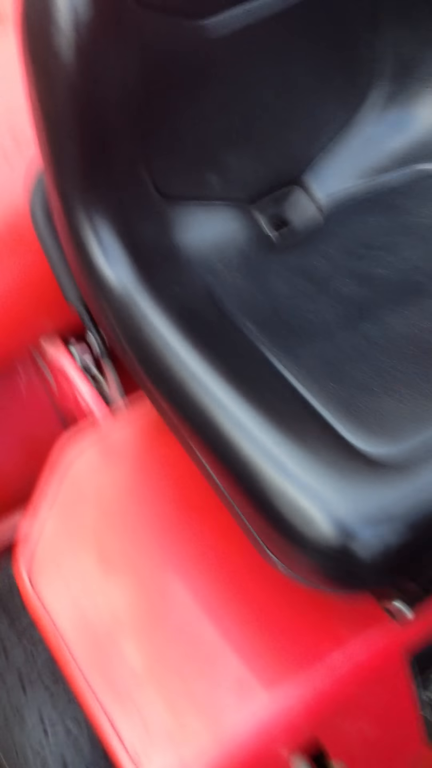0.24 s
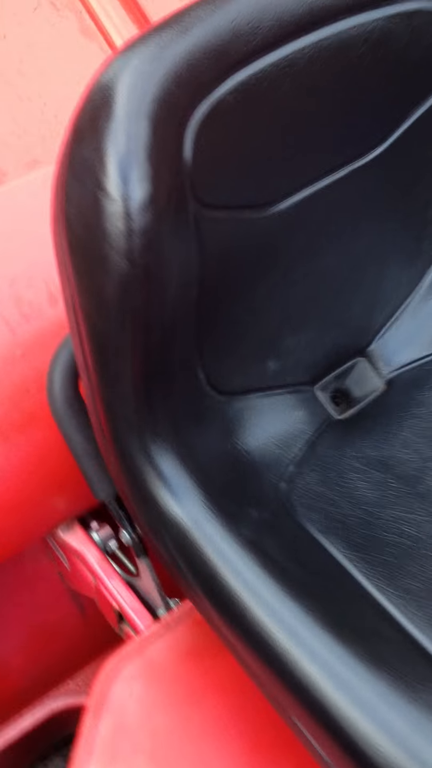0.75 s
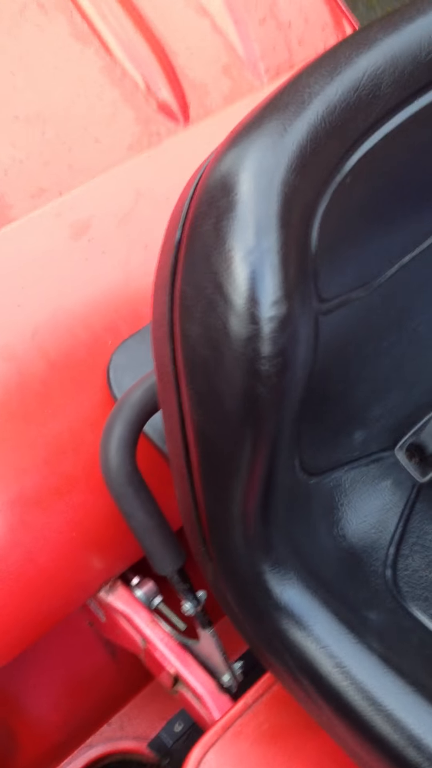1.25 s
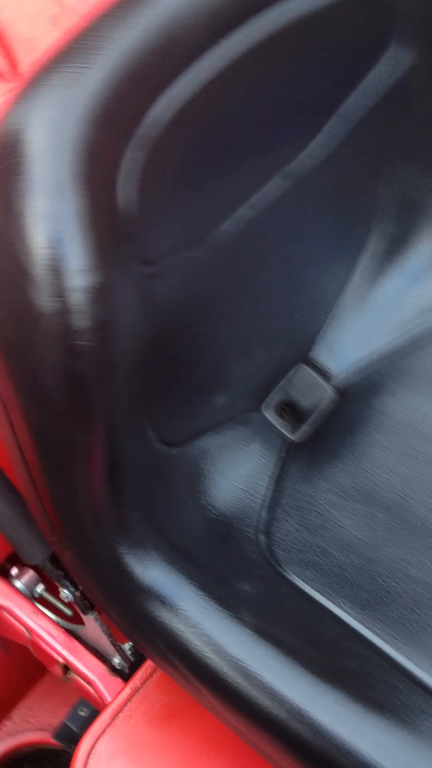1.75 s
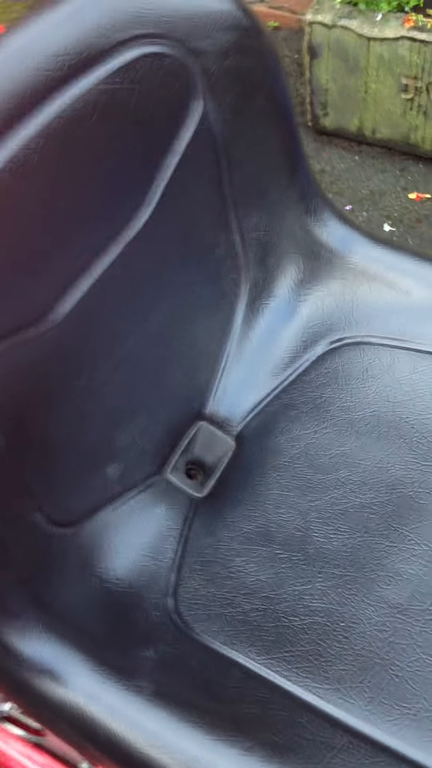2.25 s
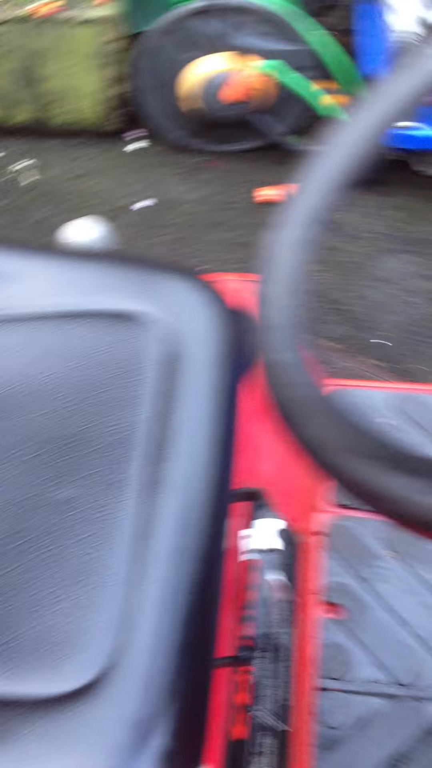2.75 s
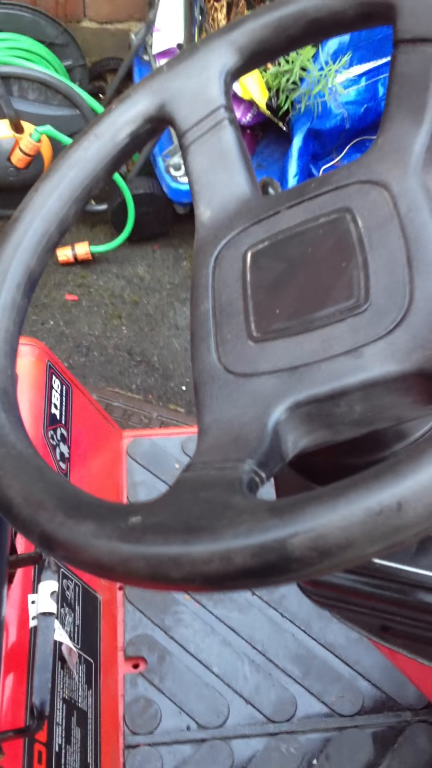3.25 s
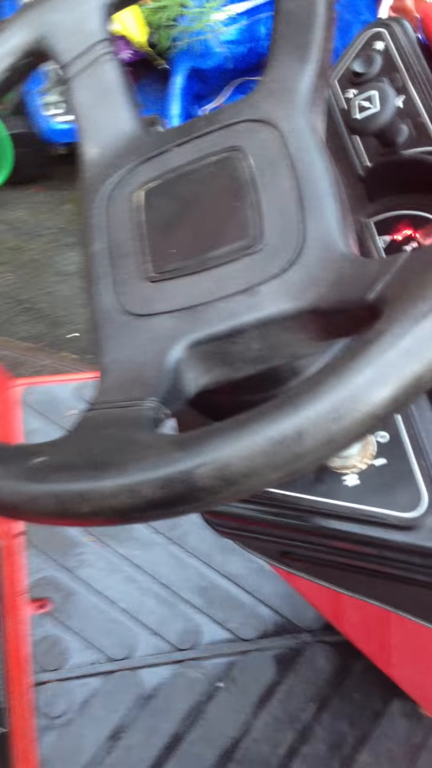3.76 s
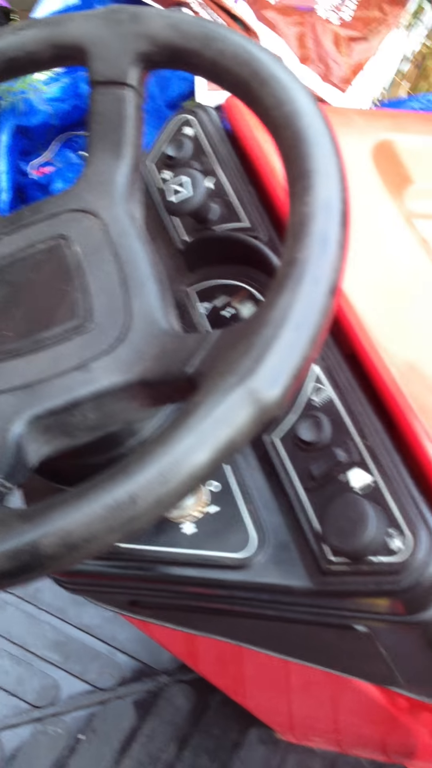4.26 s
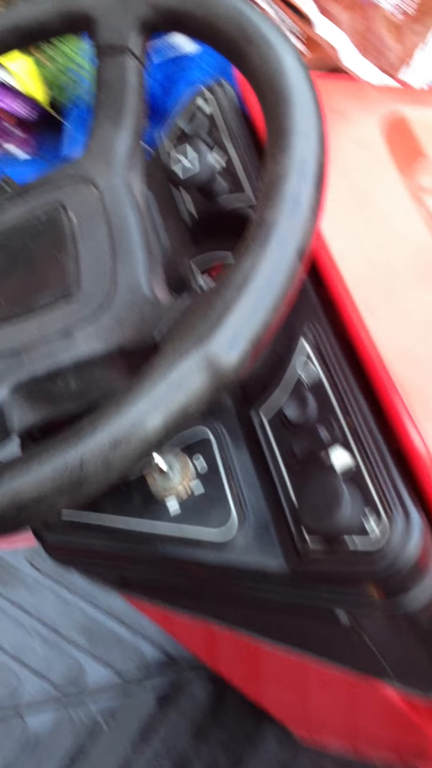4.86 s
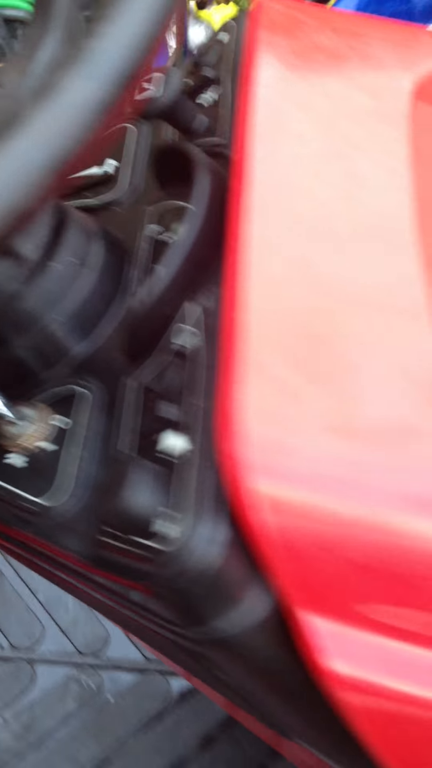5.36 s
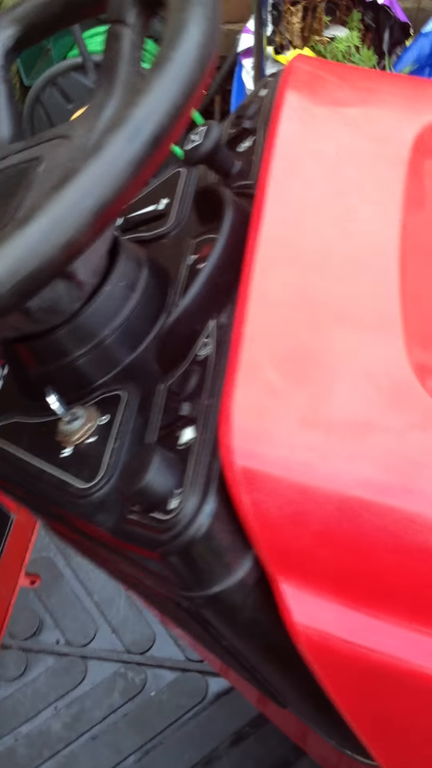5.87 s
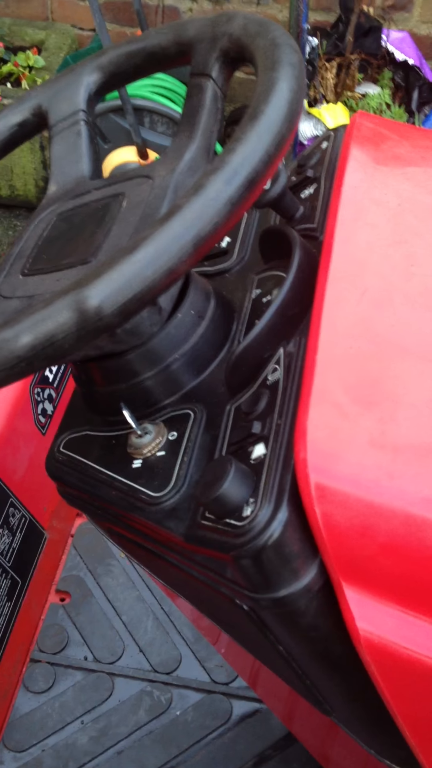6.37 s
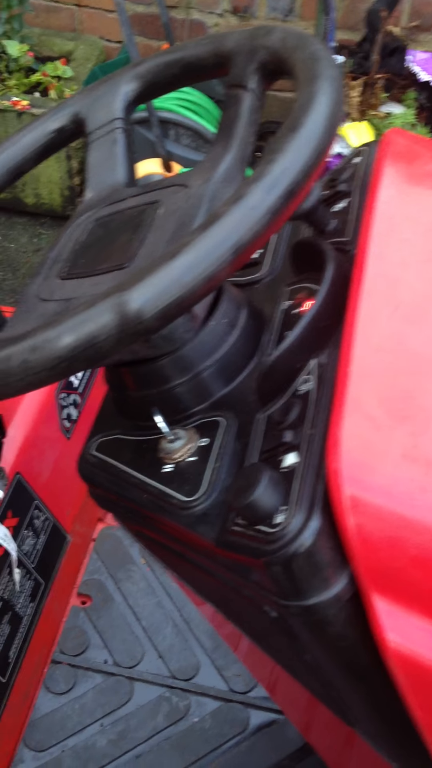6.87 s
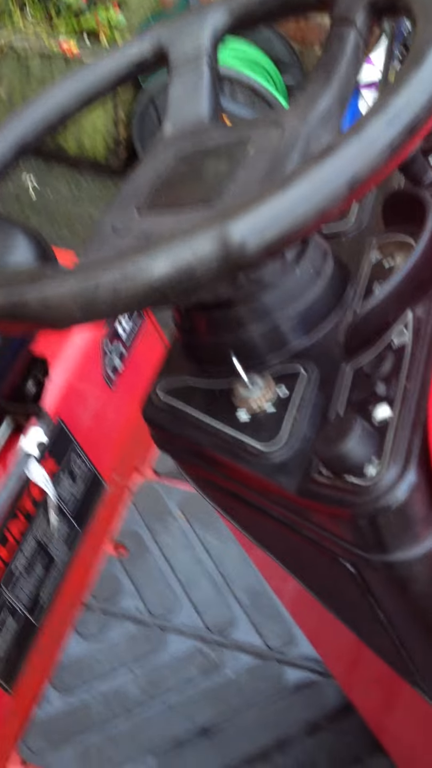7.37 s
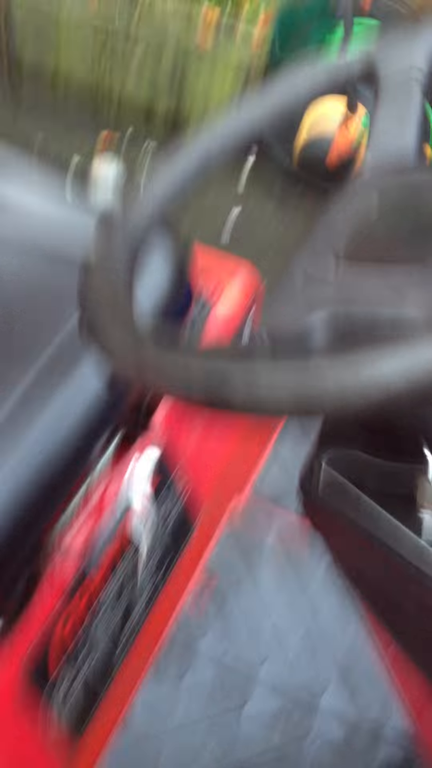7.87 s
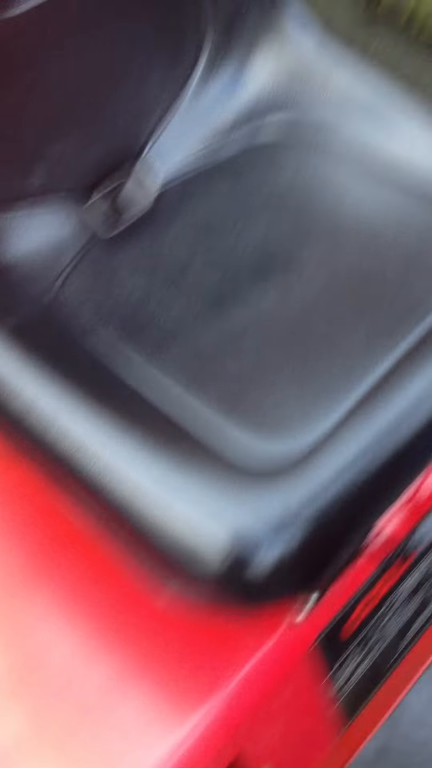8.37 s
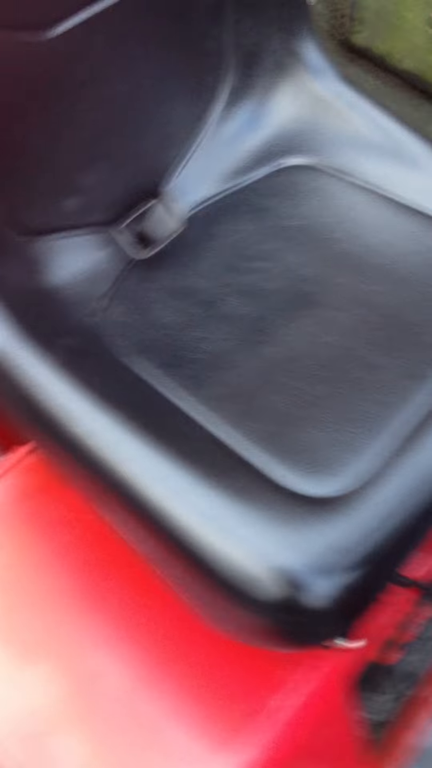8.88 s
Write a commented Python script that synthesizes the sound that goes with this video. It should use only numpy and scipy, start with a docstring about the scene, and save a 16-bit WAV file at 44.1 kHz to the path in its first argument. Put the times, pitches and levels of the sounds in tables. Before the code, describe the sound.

A single-cylinder ride-on mower idles close by outdoors, a quick low chug with hissing exhaust puffs and metallic casing rattle. A handheld microphone moves along it; a finger creeps over the port, dulling the treble. A loud scrape falls midway, then the engine is heavily muffled with little clicks, until a sharp pop opens the sound and it idles on, briefly ducked.

```python
"""Idling ride-on mower, finger on the microphone

A single-cylinder ride-on mower idles in a yard while a hand-held camera sweeps along it.
Each four-stroke cycle gives hissing exhaust puffs, a thump in the silencer and a casing rattle.
The hiss is shaped noise; thump, panels and outlet are ringing modes driven by pulses or noise.
A finger slides over the microphone port, muffles the engine, and lets go with a pop that ducks
the gain; clicks sound at the port, and faint dull noise swells just before the pop."""
import sys
import numpy as np
from scipy import signal
from scipy.fft import rfft, irfft, next_fast_len
from scipy.io import wavfile
from scipy.ndimage import uniform_filter1d

SR = 44100
rng = np.random.default_rng(int(sys.argv[2]) if len(sys.argv) > 2 else 0)


def wav_out(sig):
    """Save sig, one row per channel (or a flat mono array), as 16-bit PCM at SR to the path in sys.argv[1]."""
    wavfile.write(sys.argv[1], SR, np.round(np.clip(np.atleast_2d(sig).T, -1, 1) * 32767).astype(np.int16))


N = 402191
TIME_S = np.arange(N) / SR


def gain_of(db):
    """Decibels to an amplitude factor."""
    return 10 ** (np.asarray(db) / 20)


def evened(x):
    """Scale to rms 1."""
    return x / np.sqrt(np.mean(x ** 2) + 1e-20)


def curves(rows, at=TIME_S):
    """Interpolate every further column of a table over its first."""
    first, *columns = np.transpose(rows)
    return [np.interp(at, first, column) for column in columns]


def coloured(x, points):
    """Filter x by a spectrum drawn on a log frequency axis; rms 1."""
    size = next_fast_len(len(x))
    hz, db = np.transpose(points)
    log_hz = np.log(np.fft.rfftfreq(size, 1 / SR) + 1)
    shape_db = np.interp(log_hz, np.log(hz + 1), db)
    return evened(irfft(rfft(x, size) * gain_of(shape_db), size)[:len(x)])


def ring(x, hz, width_hz):
    """One mode: a blow in x starts a dying sine."""
    pole = np.exp((2j * np.pi * hz - np.pi * width_hz) / SR)
    return signal.lfilter([1], [1, -pole], x).imag


def grains(count):
    """Noise with random peaks, like many small impacts."""
    return rng.standard_normal(count) * gain_of(2.0 * np.minimum(rng.exponential(1, count), 4))


def per_cycle(cycles, spread_db, count=1):
    """Random gains held for one cycle: no two firings are alike."""
    draws = rng.standard_normal((int(cycles[-1]) + 1, count))
    gains = gain_of(spread_db * np.clip(draws, -3, 1.5))
    return gains[cycles.astype(int)].T


def blows(cycles, places):
    """One click each time the crank passes a given place."""
    clicks = 0
    for at, db in places:
        passed = np.floor(cycles - at)
        clicks = clicks + gain_of(db) * np.diff(passed, prepend=np.floor(cycles[0] - at))
    return clicks


# crank speed as the governor hunts: (time [s], speed [turns/min])
SPEED_RPM = [(0.0, 1299.8), (0.61, 1276.2), (1.22, 1247.4), (1.82, 1282.2), (2.43, 1277.2), (3.04, 1273.3),
             (3.65, 1302.8), (4.26, 1290.4), (4.86, 1251.4), (5.47, 1275.0), (6.08, 1301.3), (6.69, 1264.9),
             (7.3, 1309.1), (7.9, 1285.7), (8.51, 1302.4), (9.12, 1266.4)]
START_CYCLES = -.08  # done at time zero, counted from the opening of the exhaust valve


def crank():
    """Four-stroke cycle count: two turns each, plus one so that it starts above zero."""
    return 1 + START_CYCLES + np.cumsum(curves(SPEED_RPM)[0]) / SR / 120


# spectrum of the noise at the port: (frequency [Hz], level [dB per Hz])
SKIN_SPECTRUM = [(35, -61.5), (60, -33.5), (298, -6.5), (889, -3), (1120, -0.5), (1260, -2.5), (3190, -5),
                 (9510, -23.5), (13500, -32.5), (15500, -29)]
SLIDE_EDGE_DB = -32  # either end of a slide, re its hold


def slide(start_s, rise_s, hold_s, fall_s, db, dull):
    """Dense grains that swell, hold and fade; dullness mixes in a muted copy."""
    end_s = rise_s + hold_s + fall_s
    t = np.arange(0, end_s, 1 / SR)
    source = grains(8000)
    bright = coloured(source, SKIN_SPECTRUM)
    muted_spectrum = [(hz, level_db - 9.77 * np.log2(np.clip(hz, 300, 3500) / 300))
                      for hz, level_db in SKIN_SPECTRUM]
    muted = coloured(source, muted_spectrum)
    shape_db = np.interp(t, [0, rise_s, rise_s + hold_s, end_s], [SLIDE_EDGE_DB, 0, 0, SLIDE_EDGE_DB])
    dull = np.clip(dull, 0, 1)
    noise = ((1 - dull) * bright + dull * muted)[:len(t)]
    out = np.zeros(N)
    out[round(start_s * SR):][:len(t)] = gain_of(db + shape_db) * np.minimum(t / 0.0012, 1) * noise
    return out


# skin dragging over the port, and faint dull noise that swells just before the pop (7.572 s):
# (start [s], rise [s], hold [s], fall [s], level [dB], dullness [0-1])
SLIDES = [(3.564, 0.0256, 0.03054, 0.0262, -2.5, 0.34), (5.039, 0.0169, 0.053, 0.028, -43.5, 0.77),
          (5.114, 0.0404, 0.0168, 0.076, -18, 0.91), (5.188, 0.0152, 0.0516, 0.026, -28.5, 0.96),
          (7.572, 0.0296, 0.0042, .004, -32, 1), (7.609, 0.00557, 0.00691, 0.0025, -0.5, 0.84)]
# clicks at the port: skin coming unstuck, and faint ones just before the pop:
# (time [s], peak [dB], time to peak [ms], delay of echo [ms])
TICKS = [(5.0588, -33.5, 0.058, .05), (5.0618, -44, .05, .05), (5.087, -26, 0.066, 0.094),
         (5.0965, -42, .05, .05), (5.2017, -17, 0.08, .05), (5.2178, -11, 0.067, 0.072),
         (5.253, -32, .08, .05), (5.2552, -24.5, 0.061, 0.048), (6.932, -43.5, 0.091, .1),
         (7.082, -20.5, 0.181, .19), (7.5897, -34.5, 0.188, 0.166), (7.602, -28, 0.164, 0.22),
         (7.6115, -25.5, 2.3, 0.97), (7.6061, -14, 0.32, 0.44)]
TICK_ECHO_DB = -13.5
# port springing open: (time [s], level [dB], frequency [Hz], T60 [s])
POPS = [(7.6113, 0, 292, 0.0375), (7.6135, 2.5, 620, 0.033), (7.6157, -2.5, 878, 0.0224),
        (7.6214, 6, 228, 0.025)]


def handling():
    """Noise swells, clicks as one-sided pressure jolts, and a pop of dying sines, all at the port."""
    out = sum(slide(*row) for row in SLIDES)
    t = np.arange(4000) / SR
    for at_s, peak_db, peak_ms, echo_ms in TICKS:
        for late_ms, db in ((0, peak_db), (echo_ms, peak_db + TICK_ECHO_DB)):
            u = np.maximum(1000 * t - late_ms, 0) / peak_ms
            out[round(at_s * SR):][:len(t)] += gain_of(db) * (u * np.exp(1 - u)) ** 2
    for at_s, db, hz, t60_s in POPS:
        out[round(at_s * SR):][:len(t)] += gain_of(db - 60 * t / t60_s) * np.sin(2 * np.pi * hz * t)
    return out


# modes of a loose part: (frequency [Hz], width [Hz], level [dB])
CHIRP_MODES = [(1910, 47, 2.5), (2640, 27, -1), (2881, 25, -2), (3446, 35, -2.5)]
CHIRP_AT_CYCLE = .32


def chirp(cycles):
    """A short scrape once a cycle rings a few high modes, unevenly."""
    envelope = signal.oaconvolve(blows(cycles, [(CHIRP_AT_CYCLE, 0)]), np.hanning(500))[:N]
    scrape = envelope * rng.standard_normal(N)
    luck = per_cycle(cycles, 4.0, count=len(CHIRP_MODES))
    return evened(sum(gain_of(db) * evened(ring(scrape * gain, hz, width_hz))
                      for gain, (hz, width_hz, db) in zip(luck, CHIRP_MODES)))


# valve gear knocks: (place in cycle [0-1], level [dB])
KNOCKS = [(0.69, 3.5), (0.759, 3), (.85, 0.5), (0.951, -4), (0.101, 0), (0.229, 2.5), (.52, -1.5)]
KNOCK_T60_S = 0.05


def valve_knocks(cycles):
    """Each knock, of varying strength, sets off the same short broadband shudder."""
    t = TIME_S[:4000]
    shudder = rng.standard_normal(4000) * gain_of(-60 * t / KNOCK_T60_S) * np.minimum(t / 0.0019, 1)
    spectrum = rfft(shudder)
    shudder = irfft(spectrum / uniform_filter1d(abs(spectrum), 7))  # no colour of its own
    strengths = gain_of(0.83 * rng.standard_normal(N))
    return evened(signal.oaconvolve(blows(cycles, KNOCKS) * strengths, shudder)[:N])


# broad rattle spectrum: (frequency [Hz], level [dB per Hz])
RATTLE_SPECTRUM = [(220, -12), (380, -2), (456, -15), (842, -0.5), (934, 2), (1430, -0.5), (2330, -9.5),
                   (3000, -10.5), (3900, -47), (6600, -120)]
# bonnet and deck modes: (frequency [Hz], width [Hz], level [dB])
PANELS = [(524, 15, -5), (607.6, 34, 0.5), (658.2, 31, 1.5), (719.5, 16, 0), (788.8, 46, -1.5),
          (875.2, 54, 2.5), (914.3, 24, -4.5), (1039.7, 47, -6.5), (1117.9, 16, -4.5), (1164.5, 10, -2.5),
          (1245.3, 14, -2), (1472.8, 18, -4), (1638.6, 7.1, -5.5), (1798.4, 9.3, -11), (2012.5, 23, -9.5),
          (2157, 12, -15.5)]
# casing shakes hardest: (place in cycle [0-1], width [cycles], rise [dB])
SHAKE = [(0.221, 0.12, 1), (0.749, 0.13, 1)]
KNOCK_TO_PANELS_DB = 4  # re rms 1


def rattle(cycles):
    """Fan noise and small taps in the panels, which the valve gear also knocks in every cycle."""
    shake_db = 0
    for at, width, db in SHAKE:
        bump = np.exp((np.cos(2 * np.pi * (cycles - at)) - 1) / (2 * np.pi * width) ** 2)
        shake_db = shake_db + db * bump
    taps = evened(grains(N) * gain_of(shake_db) * per_cycle(cycles, .8)[0])
    knocks = valve_knocks(cycles)
    drive = taps + gain_of(KNOCK_TO_PANELS_DB) * knocks
    luck = per_cycle(cycles - .5, 1.5, count=len(PANELS))  # each panel shakes differently
    panels = sum(gain_of(db) * evened(ring(drive * gain, hz, width_hz))
                 for gain, (hz, width_hz, db) in zip(luck, PANELS))
    broad = coloured(taps + .9 * knocks, RATTLE_SPECTRUM)
    return evened(broad + gain_of(-1) * evened(panels))


# gas bursts, before the depth factors: (place in cycle [0-1], level [dB], fade [dB/cycle])
PUFFS = [(0.028, 4, 9), (0.419, 0.5, 7)]
PUFF_RISE_CYCLES = 0.019


def puff_level_db(cycles):
    """Level through the cycle: each burst rises fast and fades."""
    power = 0
    for at, db, fade_db in PUFFS:
        since = (cycles - at) % 1
        power = power + (gain_of(db - fade_db * since) * np.minimum(since / PUFF_RISE_CYCLES, 1)) ** 2
    return 10 * np.log10(power + 1e-6)


# cycles with extra hiss: louder puffs, and a broadband scrape near 3.8 s:
# (time [s], extra level at mid-cycle [dB])
EXTRA_HISS = [(1.36, 1), (2.86, 3.5), (2.96, 1.5), (3.05, 2.5), (3.14, 2.5), (3.52, 2.5), (3.8, 3)]


def extra_hiss(cycles):
    """Extra gain in the listed cycles: 1.5 times the listed dB at the start, half at the end."""
    extra_db = np.zeros(int(cycles[-1]) + 1)
    for at_s, db in EXTRA_HISS:
        extra_db[int(cycles[round(at_s * SR)])] = db
    return gain_of(extra_db[cycles.astype(int)] * (1.5 - cycles % 1))


PATCH_HZ, PATCH_SPREAD_DB = [2200, 3200, 4500, 5800, 7000, 8500, 11000], 1.8


def patchy(x, cycles):
    """Split x into bands, each with its own random gain every half cycle."""
    lows = [0 * x]
    for hz in PATCH_HZ:
        lows.append(signal.sosfiltfilt(signal.butter(3, hz, fs=SR, output="sos"), x))
    lows.append(x)
    gains = per_cycle(2 * cycles + .1, PATCH_SPREAD_DB, count=len(lows) - 1)
    return sum(gain * (high - low) for gain, low, high in zip(gains, lows, lows[1:]))


# hiss heard from aside: (frequency [Hz], level [dB per Hz])
JET_SIDE = [(1060, -35), (1800, -11), (2340, -17), (2930, -4), (4010, -7.5), (4590, -1.5), (5350, -7.5),
            (7820, -10.5), (10100, -15.5), (12200, -11), (13500, -14.5), (15500, -22.5)]
# hiss heard from in front: (frequency [Hz], level [dB per Hz])
JET_FACING = [(1060, -36.5), (1800, -13), (1920, -4.5), (2720, -25), (3410, 4), (4980, -18.5), (7890, -0.5),
              (10200, -5.5), (14700, -4.5), (15500, -11.5)]
# outlet and heat shield modes:
# (frequency [Hz], width [Hz], level from aside [dB], level from in front [dB])
OUTLET = [(2613, 33, -7, -13), (2996, 65, -9.5, -5.5), (3347, 33, -3, -3), (3832, 51, -12.5, -9.5),
          (4680, 61, -0.5, -18), (6162, 99, -5, -8.5), (6624, 140, -4, -2.5), (7304, 130, -3.5, -3),
          (8050, 91, -3, 0.5), (9153, 290, -11.5, 0), (11935, 580, -7, -11.5)]
DETUNE = .012  # each whistle is a low and a high mode, weighted anew every cycle
TREBLE_HZ, TREBLE_LEAD_CYCLES = 5500, 0.031
TREBLE_DEPTH, BODY_DEPTH = 1.55, .8  # factors on the puff dB


def hiss(cycles, facing):
    """Gas rushes out in bursts that fade through the cycle; each puff whistles differently."""
    gas, puff_db = rng.standard_normal(N), puff_level_db(cycles)
    jet = (1 - facing) * coloured(gas, JET_SIDE) + facing * coloured(gas, JET_FACING)
    jet = patchy(jet, cycles)
    body = signal.sosfiltfilt(signal.butter(2, TREBLE_HZ, fs=SR, output="sos"), jet)
    treble = jet - body
    gust = gas * gain_of(4.5 * puff_db)  # drives the metal mostly at the start of a burst
    luck = per_cycle(cycles, 4.0, count=2 * len(OUTLET))
    tunes = np.repeat([1 - DETUNE, 1 + DETUNE], len(OUTLET))
    whistle = 0
    for gain, tune, (hz, width_hz, side_db, front_db) in zip(luck, tunes, OUTLET + OUTLET):
        level = gain_of(side_db + facing * (front_db - side_db))
        whistle = whistle + gain * level * evened(ring(gust, hz * tune, width_hz))
    early_puff_db = puff_level_db(cycles + TREBLE_LEAD_CYCLES)
    rush = body * gain_of(BODY_DEPTH * puff_db) + treble * gain_of(TREBLE_DEPTH * early_puff_db)
    sound = evened(rush) + gain_of(-16.0) * whistle
    return evened(sound * per_cycle(cycles, 1.3)[0]) * extra_hiss(cycles)


SWELL_S = .0077  # length of a pulse as a mode feels it


def swell(hz, late_ms):
    """A short burst at the pitch of one mode: how a pulse feeds it."""
    t = np.arange(-1500, 1501) / SR
    u = np.clip((t - late_ms / 1000) / SWELL_S, -.5, .5)
    return np.cos(np.pi * u) ** 2 * np.cos(2 * np.pi * hz * t)


WAVER_RMS_S, WAVER_HZ = .0005, 9  # sines at 0.3 to 1.5 times this rate


def wavered(x):
    """The hot gas column stretches and shrinks the ring in time."""
    coarse_s = TIME_S[::100]
    waver = sum(np.sin(2 * np.pi * (hz * coarse_s + rng.random()))
                for hz in WAVER_HZ * np.geomspace(.3, 1.5, 12))
    shift_s = WAVER_RMS_S * np.interp(TIME_S, coarse_s, evened(waver))
    return np.interp(TIME_S + shift_s, TIME_S, x)


# pressure pulses into the silencer: (place in cycle [0-1], level [dB])
PULSES = [(.556, 0), (.185, -7), (.916, -22)]
# silencer and pipe modes: (frequency [Hz], width [Hz], level [dB],
# first motion [1 outward, -1 inward], delay of uptake after the pulse's middle [ms])
SILENCER = [(54, 5, -24, -1, -20), (88, 16, -15, 1, -24), (121.5, 14.7, -11.5, -1, 27),
            (140.8, 9.3, 0, -1, -15.4), (176.1, 24.7, -.8, -1, -5.3), (216, 5.4, -8, -1, 24),
            (230, 13.2, -5.6, -1, 3.5), (253, 20, -13, 1, -10), (287, 14, -22, 1, 5),
            (317.2, 9, -18, -1, -9), (351, 12, -19, 1, 16)]


def thump(cycles, upper_db, top_db):
    """Soft pressure pulses at fixed crank angles ring the silencer; its pitch wavers a little."""
    pulses = blows(cycles, PULSES) * per_cycle(cycles, .8)[0]
    drive = evened(np.convolve(pulses, np.hanning(50))[:N])
    drive = drive + .2 * rng.standard_normal(N)  # unsteady flow blurs the ring
    luck = per_cycle(cycles - PULSES[0][0] / 2, 1.2, count=len(SILENCER))
    sound = 0
    for gain, (hz, width_hz, db, way, late_ms) in zip(luck, SILENCER):
        view_db = upper_db if 200 < hz < 250 else top_db if hz > 160 else 0
        feed = signal.oaconvolve(drive * gain, swell(hz, late_ms), "same")
        sound = sound + np.sign(way) * gain_of(db + view_db) * ring(feed, hz, width_hz)
    return evened(wavered(sound))


# finger moves on the port: (start [s], length [s], free gap afterwards [dB re open])
MOVES = [(1.438, 0.3065, -9), (1.756, 0.51, -10.5), (2.251, 0.484, -2), (3.596, 0.038, -13),
         (3.781, 0.036, -18), (4.0, 0.265, -18.5), (4.431, 0.142, -22), (4.557, 0.269, -23.5),
         (5.03, 0.256, -21), (5.562, 0.187, -22.5), (5.969, 0.12, -21.5), (6.448, 0.171, -21.5),
         (6.657, 0.129, -24), (6.824, 0.318, -26), (7.609, .015, 1.5)]


def gap_level_db(t):
    """Free gap: glides to a new width at each move and stays; never wider than open."""
    gap_db, before_db = np.zeros(len(t)), 0
    for start_s, length_s, db in MOVES:
        gap_db = gap_db + (db - before_db) * np.clip((t - start_s) / length_s, 0, 1)
        before_db = db
    return np.minimum(gap_db, 0)


# port against gap: (gap [dB re open], sharpness of port resonance [ratio], leak past the skin [dB])
SEAL = [(-25, 0.5, -48), (-21, 0.7, -45.5), (-18, 1, -26), (-17, 1, -24), (-16, 0.89, -12.5),
        (-14.5, 1, -11.5), (-11, .9, -21), (-8, 0.86, -15), (-3, .8, -6)]
# colour of the leak, added to its level: (frequency [Hz], level [dB])
LEAK_COLOUR = [(4000, 7), (8000, 2.5), (10000, -1), (13000, 5.5)]
CANCEL = .8  # how far the leak opposes the sound through the gap


def covered(x):
    """The gap and the air behind it form a damped low-pass; some sound leaks past the finger."""
    hz, t, z = signal.stft(x, SR, nperseg=512, noverlap=384)
    gap_db = gap_level_db(t)
    sharp, leak_db = curves(SEAL, gap_db)
    leak = gain_of(leak_db + curves(LEAK_COLOUR, hz)[0][:, None])
    ratio = hz[:, None] / (20000 * gain_of(gap_db))  # 20 kHz resonance when open
    port = abs(1 - ratio ** 2 + 1j * ratio / np.maximum(sharp, .1)) ** -2.8
    gain = np.sqrt(port ** 2 + leak ** 2 - 2 * CANCEL * port * leak)
    return signal.istft(z * gain, SR, nperseg=512, noverlap=384)[1][:N]


# levels at the moving camera: (time [s], thump [dB], its 200-250 Hz modes [dB, relative],
# its other modes above 160 Hz [dB, relative], rattle [dB], hiss [dB], facing the exhaust [0-1])
VIEW = [(0, -21.5, 2.5, 4, -24.5, -33.5, 0.2), (.8, -19.5, 4.5, 2.5, -28, -33.5, 0.2),
        (1.28, -22.5, 3, 8.5, -28, -35, 0.1), (1.4, -20.5, 5, 7.5, -26.5, -26.5, 0.5),
        (1.8, -19, 1.5, 3, -26.5, -28.5, 1), (2.3, -21, 2.5, 3.5, -28, -30.5, 1),
        (2.6, -18.5, 6.5, 3, -26.5, -25, 0.9), (3.5, -17.5, 2.5, 1.5, -25.5, -28, 0.5),
        (3.9, -23.5, -0.5, 2, -34, -38, 0.3), (4.4, -25.5, 4, 2.5, -35.5, -39, 0.5),
        (4.85, -27.5, 2, 4.5, -45, -40.5, .7), (5.3, -23.5, 4.5, 1.5, -33, -26.5, 0.7),
        (5.85, -25, 3, -0.5, -34, -28.5, 0.3), (6.5, -25.5, 3.5, 1, -35, -30.5, 0.5),
        (7.5, -29.5, 0, 1, -40.5, -42.5, 0.4), (8.2, -26.5, 0, -1, -33, -40.5, 0.2),
        (9.12, -24.5, -0.5, 2.5, -32.5, -38.5, 0)]
CHIRP_DB = -17  # re rattle


def scene():
    """The engine as the moving camera meets it, behind the finger, plus the noises at the port."""
    cycles = crank()
    thump_db, upper_db, top_db, rattle_db, hiss_db, facing = curves(VIEW)
    engine = gain_of(rattle_db) * (rattle(cycles) + gain_of(CHIRP_DB) * chirp(cycles))
    engine = engine + gain_of(hiss_db) * hiss(cycles, np.clip(facing, 0, 1))
    engine = engine + gain_of(thump_db) * thump(cycles, upper_db, top_db)
    return (covered(engine) + handling())[None]


# microphone self-noise: (frequency [Hz], level [dB per Hz])
SELF_NOISE = [(1470, -22.5), (2500, -2.5), (6440, -8), (9730, -14), (13600, -5), (14700, -3.5), (15500, -4)]
SELF_NOISE_DB, LOW_CUT_HZ, EDGE_HZ = -69, 110, 15500


def record(dry):
    """Low cut, self-noise, gain that drops after loud sounds and creeps back, overload, band limit."""
    x = signal.sosfilt(signal.butter(3, LOW_CUT_HZ, "high", fs=SR, output="sos"), dry[0])
    x = x + gain_of(SELF_NOISE_DB) * coloured(rng.standard_normal(N), SELF_NOISE)
    power_db = 10 * np.log10(abs(uniform_filter1d(x ** 2, 440)) + 1e-12)
    log_over = np.log(np.maximum(power_db + 16.5, 1e-3))
    # held peak of the excess, dying away
    held = np.exp(np.maximum.accumulate(log_over + TIME_S / 0.4435) - TIME_S / 0.4459)
    lag = np.exp(-1 / (0.008 * SR))  # 8 ms smoothing
    cut_db = 0.5587 * signal.lfilter([1 - lag], [1, -lag], held)
    ducked = x / gain_of(cut_db)
    clipped = 0.7441 * np.tanh(ducked / 0.9213)
    band_limit = signal.firwin(511, EDGE_HZ, window=("kaiser", 9), fs=SR)
    return signal.oaconvolve(clipped[None], band_limit[None], "same")


dry = scene()
out = record(dry)
wav_out(out)
```